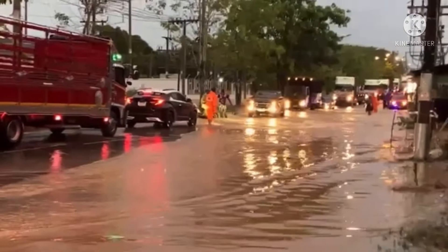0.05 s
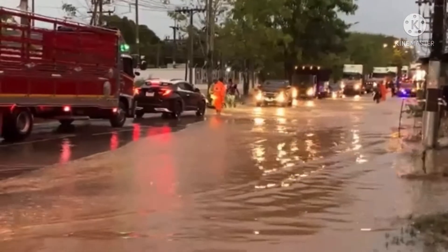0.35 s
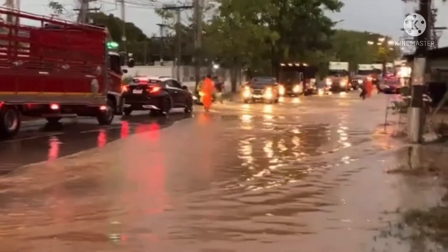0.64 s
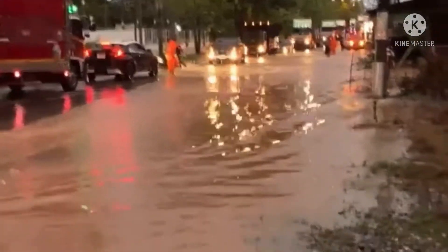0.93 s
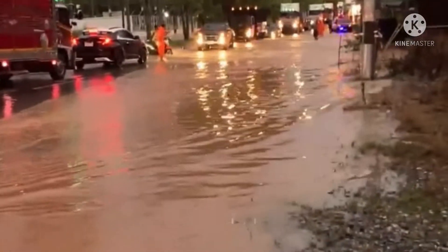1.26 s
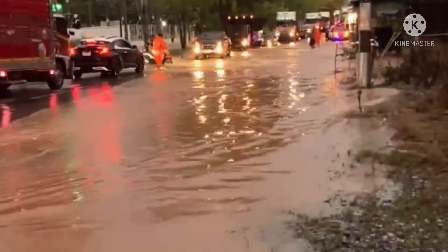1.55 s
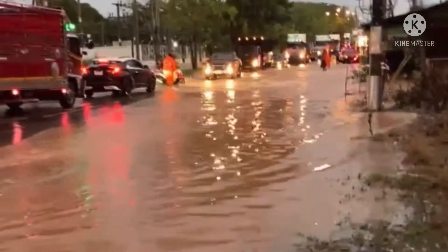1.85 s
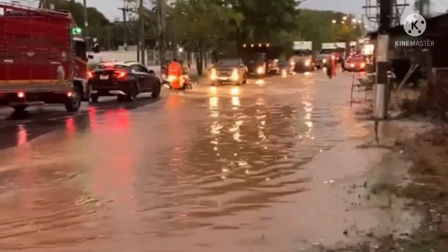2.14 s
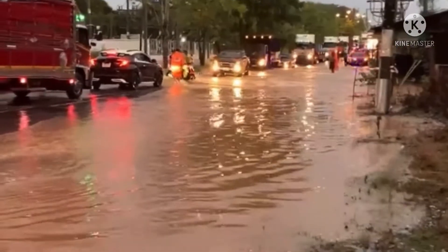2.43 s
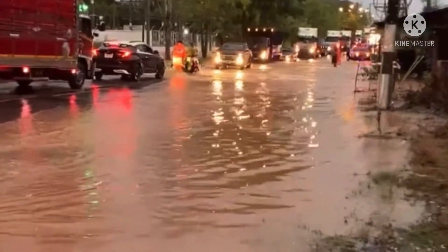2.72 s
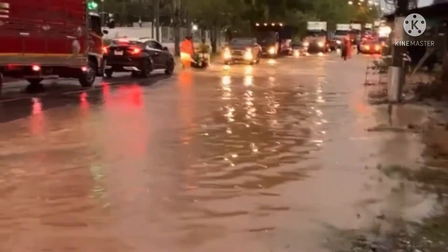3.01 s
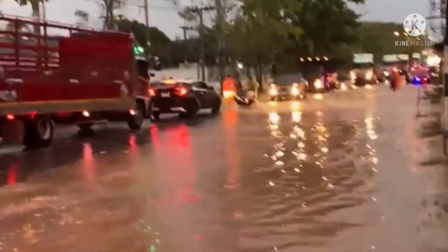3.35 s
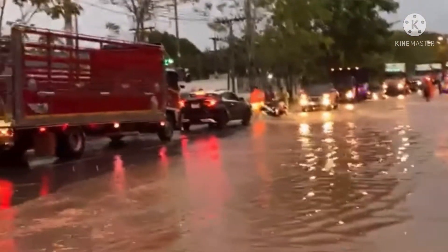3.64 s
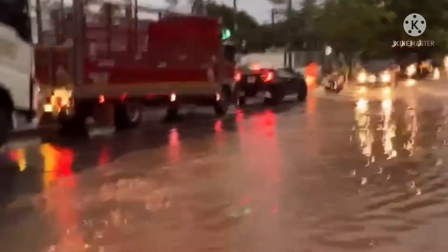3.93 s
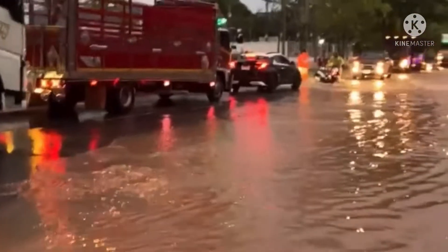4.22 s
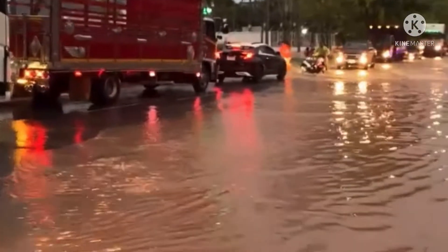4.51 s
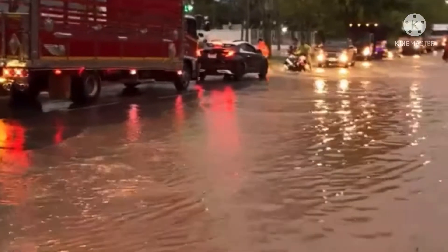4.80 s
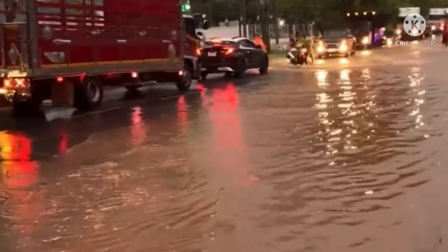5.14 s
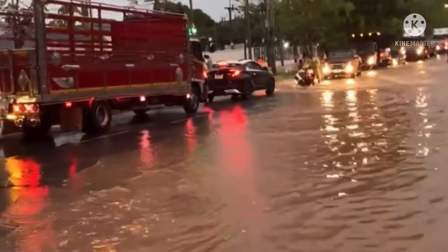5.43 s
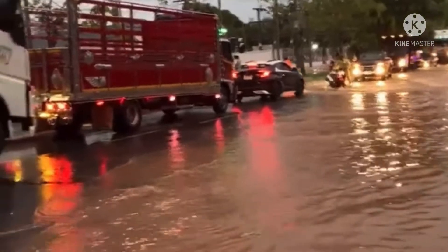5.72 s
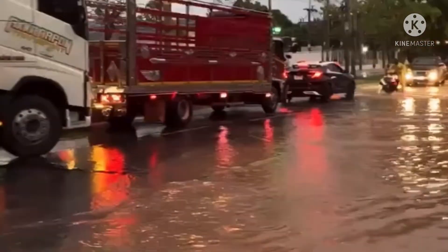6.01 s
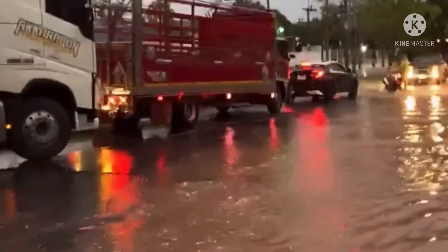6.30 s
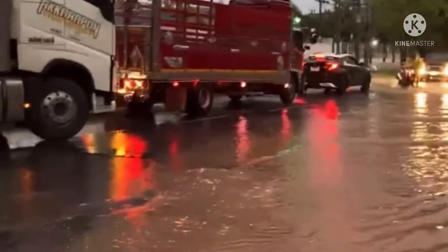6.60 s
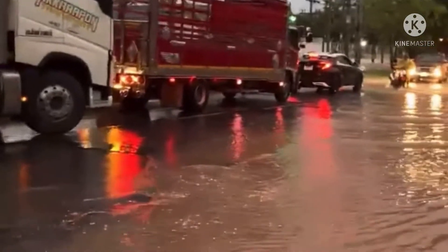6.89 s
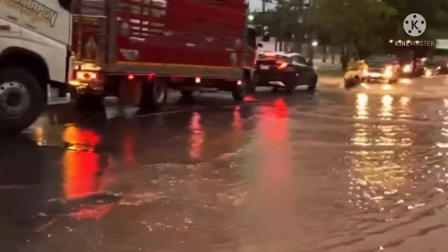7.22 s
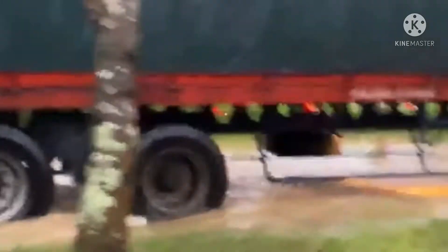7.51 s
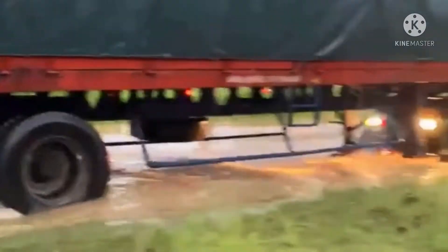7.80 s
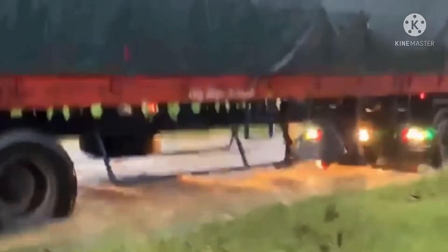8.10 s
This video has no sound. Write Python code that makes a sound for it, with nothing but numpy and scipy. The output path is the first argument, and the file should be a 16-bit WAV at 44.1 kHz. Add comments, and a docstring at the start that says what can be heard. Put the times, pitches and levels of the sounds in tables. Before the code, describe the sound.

Diesel trucks idle with a low throb while floodwater washes and gurgles around wading cars, then a heavy lorry growls through with spraying tyres.

```python
"""A flooded road: queued diesels idle while wading cars push bow waves that wash, fizz and gurgle.
Exhaust tones a few Hz apart beat into a throb; the engine blocks clatter at their own firing rates.
Drops tick nearby and air pockets plop. Near 7.2 s the queue fades out and a heavy lorry fades in,
pulling through the water with a growling exhaust and spraying tyres."""
import sys
import numpy as np
from scipy import signal
from scipy.fft import rfft, irfft, next_fast_len
from scipy.io import wavfile
from scipy.ndimage import uniform_filter1d, map_coordinates

SR = 44100
rng = np.random.default_rng(int(sys.argv[2]) if len(sys.argv) > 2 else 0)


def transcribe(u):
    """Save the signal u as a 16-bit wav file named by the first command-line argument.

    u: samples, shape (n,) or (channels, n), limited to [-1, 1]; the rate is SR.
    q: integer samples, one column per channel.
    """
    v = np.clip(np.atleast_2d(u).T, -1, 1)
    q = np.round(v * 32767).astype(np.int16)
    wavfile.write(sys.argv[1], SR, q)


N = 359415

# water noise spectra: f/Hz, relative density/dB
WASH_SPECTRUM = [(200, -19), (600, 2.5), (1500, 2.5), (2500, 1), (3150, 0.5), (3900, -1.9), (5000, -3),
                 (6200, -8), (7500, -19), (10000, -17), (15000, -38)]
CREST_SPECTRUM = [(1500, -20), (3300, 0), (5500, -2), (6500, -7), (9000, -24)]
GURGLE_SPECTRUM = [(1200, -30), (2000, -9), (2450, 1), (2900, -5), (3400, -11), (4400, -34)]
FIZZ_SPECTRUM = [(3000, -15), (6000, 5), (9500, 13), (10300, -3), (12800, 2), (13800, -9), (15500, -15)]
DROP_SPECTRUM = [(1000, -13), (4000, 2), (6000, 2), (8000, -1), (11000, -3.5), (13000, -2), (16000, -6)]
SPRAY_SPECTRUM = [(300, -10), (900, 6), (1400, 5.5), (1950, 0.5), (2500, 3), (3300, -0.5), (4000, -5.5),
                  (5200, -5.5), (7500, -10.5), (9500, -11), (10500, -14), (13000, -16), (15500, -20)]
# breaking wavelets: t/s, hiss swell/dB, gurgle swell/dB
WAVELETS = [(0.68, 3, 2), (0.94, 0.5, 5.5), (1.08, 0.5, 3), (2.66, 1.5, .8), (3.7, 0, 3), (3.98, .3, 4),
            (4.23, 1, 5.5), (4.45, 0, 4.5), (4.7, 1, 3), (5.19, 4.5, 1.5), (5.52, 1, 3.5), (5.75, .6, 3.5),
            (6.06, 1.5, 1.5), (6.88, .3, 4)]
# near drops: t/s, tick/dB, spatter/dB
DROPS = [(0.0953, -28, -38), (0.657, -38, -48), (1.0992, -39, -43), (2.6494, -43, -38),
         (2.9442, -36, -36.5), (2.955, -38, -44), (3.406, -38, -48), (3.5325, -42, -44),
         (3.9099, -31.5, -40), (4.4024, -37, -42)]
# air pockets: t/s, level/dB, f/Hz
PLOPS = [(0.32, -48, 3300), (0.33, -49, 4380), (0.55, -49, 3480), (0.58, -47, 4250), (0.82, -48, 3150),
         (0.9, -48, 2900), (0.93, -42, 2200), (1.78, -47, 2400), (2.89, -41, 1580), (4.22, -44, 2400),
         (4.28, -43, 1870), (4.45, -47, 2780), (4.62, -48, 2950), (4.685, -41, 1950), (5.17, -49, 3720),
         (5.42, -49, 3170), (5.52, -49, 3620), (5.8, -47, 3430), (5.99, -49, 3170), (7.44, -42, 3680),
         (7.445, -40, 3350), (7.53, -40, 2400), (7.595, -42, 3320), (7.76, -43, 3330), (7.78, -41, 2100),
         (7.91, -43, 3000)]

# engine noise spectra: f/Hz, relative density/dB
BOOM_SPECTRUM = [(20, -17), (37, 0), (48, -1), (58, 8), (64, 6.5), (75, 4), (120, -43)]
DRONE_SPECTRUM = [(45, -41), (70, -2.5), (100, 0), (125, -2.5), (150, -4.5), (240, -5.5), (330, -9),
                  (420, -17), (700, -19), (2000, -51.5)]
BLOCK_SPECTRUM = [(220, -23), (400, -2), (580, 0), (740, -4), (850, -0.5), (910, 2.5), (970, -1.5),
                  (1050, 0.5), (1160, -3.5), (1540, -3.5), (1900, -9.5), (2200, -12.5), (2450, -10),
                  (4000, -22.5)]  # blocks and tyres
GROWL_SPECTRUM = [(25, -11), (60, 2), (110, 2), (200, -5), (280, -3.5), (400, -1), (500, -3), (620, -7.5),
                  (720, -11), (1000, -15), (1600, -27), (3000, -49)]
# engine tones: multiple of firing rate, level/dB
TRUCK_TONES = [(2, -30), (3, -36.5), (4, -46.5), (22, -56.5)]
TRACTOR_TONES = [(1, -55), (4 / 3, -51), (2, -30), (7 / 3, -44.5), (3, -40), (4, -45.5), (26 / 3, -47.5),
                 (11, -45)]
CAB_TONES = [(22 / 3, -41)]  # tractor cab buzz
CAR_TONES = [(2, -42), (4, -35.5)]
LOPE_TONES = [(2 / 3, -40), (4 / 3, -37), (5 / 3, -34), (8 / 3, -38), (11 / 3, -36), (16 / 3, -38),
              (19 / 3, -36), (20 / 3, -40), (22 / 3, -39.5)]  # lorry's unequal cylinders
# firing rates: t/s, f/Hz
TRACTOR_FIRING_HZ = [(0, 30.24), (1, 30.12), (1.4, 30.01), (1.75, 29.99), (2.1, 29.89), (2.7, 29.9),
                     (3.1, 29.99), (3.5, 29.99), (3.9, 30.09), (4.35, 30.09), (4.8, 29.99)]  # idle hunts
LORRY_FIRING_HZ = [(7.3, 58.4), (7.62, 57.2), (7.72, 57.6), (7.82, 58.7), (8.15, 61.3)]
# queue envelopes: t/s, gain/dB
DRONE_DB = [(0, -29.6), (1.1, -30), (2.2, -29), (3.1, -28), (4.4, -28.6), (5.4, -29.4), (7, -29.4)]
CAR_DB = [(0, -3), (2.3, 2.5), (3.3, 0), (4.3, 4), (5.7, 1.5), (6.3, -7)]
TRACTOR_DB = [(.15, 3), (.6, -5), (1.1, 2), (1.55, 3.5), (1.85, -7), (2.08, 2), (2.3, -6), (2.62, -11),
              (2.8, 4.5), (3.2, -4), (3.5, 3), (3.9, -2), (4.4, -2.5), (4.8, 3.5), (5.15, 0), (5.6, 4),
              (6.05, -6), (6.55, 4), (6.85, 3.5), (7.1, -7)]
CAB_DB = [(0, -6), (3.3, -6), (4.3, 0), (5.4, -10), (6, 0), (7, 2.5)]  # grows as the microphone turns to it
# lorry envelopes: t/s, gain/dB
GROWL_DB = [(7.4, -26), (7.63, -23.5), (7.8, -27), (7.92, -26), (8.14, -24)]  # engine load
BARK_DB = [(7.4, -7.5), (7.77, -9), (7.85, -0.5), (8.1, 0.7)]  # exhaust opens up: 2nd harmonic
SPRAY_DB = [(7.5, -29.9), (7.8, -30.3), (8.15, -31)]  # wheels draw away
# lorry exhaust resonances: f/Hz, width/Hz, peak gain/dB
PIPE_MODES = [(57.5, 14, -16.4), (121.5, 13, -15.3), (177.5, 7, -23.2), (234.5, 22, -20.8)]
SILENCER_MODES = [(100, 17, -6), (210, 150, -9), (321, 14, -2), (384, 10, 3), (420, 8, 3.5)]

# scene fades: t/s, gain
QUEUE_FADE = [(7.17, 1), (7.231, .45), (7.233, .03), (7.255, 0)]
LORRY_FADE = [(7.303, 0), (7.33, .13), (7.39, .48), (7.44, 1)]
# left-right likeness: f/Hz, coherence
QUEUE_COHERENCE = [(150, 1), (300, 0.99), (450, 0.85), (750, 0.52), (1000, 0.76), (1900, 0.88),
                   (2800, 0.38), (4400, 0.45), (5300, 0.66), (6000, 0.55), (6800, 1), (8000, 1),
                   (8800, 0.45), (9900, 0.7), (12500, 0.55), (13800, 1)]
LORRY_COHERENCE = [(200, 1), (500, 0.96), (750, 0.7), (2000, 0.81), (4200, .4), (5200, .75), (6000, 0.69),
                   (6800, 1), (8000, 1), (8800, .45), (12500, 0.67), (13800, 0.87)]
# stereo balance: f/Hz, left minus right/dB
BALANCE_DB = [(300, 0), (500, 1), (700, 2.5), (1200, 3), (1900, -0.5), (2500, -.5), (5000, 0)]
# microphone ports: f/Hz, left phase lead/rad
PORT_LEAD_RAD = [(1900, 0), (2900, 1.55), (3250, 1.6), (3900, 0.65), (5400, 0.3), (6000, 1.3), (6500, 2.7),
                 (8100, 3.3), (9700, 6.3), (12300, 6.5), (13250, 9.2), (14700, 9.5), (15500, 11.5)]

TRUCK_HZ, CAR_HZ, PICKUP_HZ = 27.02, 25.08, 23.62  # idle firing rates
IN_STEP_S = 0.176  # idling engines fire together
TIME_S = np.arange(N) / SR


def amp(db):
    """dB to gain."""
    return 10 ** (np.asarray(db) / 20)


def unit(x):
    """Scale to rms 1."""
    return x / np.sqrt(np.mean(x ** 2) + 1e-20)


def along(points, hz):
    """Interpolate on a log frequency axis."""
    f, v = np.transpose(points)
    return np.interp(np.log(hz + 1), np.log(f + 1), v)


def curve(points):
    """Interpolate in time, per sample."""
    return np.interp(TIME_S, *np.transpose(points))


def wobble(rate_hz):
    """Smooth random curve, knots at rate_hz."""
    return map_coordinates(rng.standard_normal(int(N * rate_hz / SR) + 4), [TIME_S * rate_hz])


def filtered(x, response):
    """Apply a frequency response."""
    m = next_fast_len(N + SR // 2)
    return irfft(rfft(x, m) * response(np.fft.rfftfreq(m, 1 / SR)), m)[..., :N]


def coloured(pair, spectrum, coherence=QUEUE_COHERENCE):
    """Two unrelated signals to stereo of given spectrum and coherence, rms 1."""
    def response(hz):
        angle = np.arccos(np.clip(along(coherence, hz), -1, 1)) / 2
        return amp(along(spectrum, hz)) * [np.cos(angle), np.sin(angle)]
    mid, side = filtered(pair, response)
    return unit(np.array([mid + side, mid - side]))


def noise(patchy_db):
    """Two noises sharing random gain patches in time and frequency."""
    bins = signal.stft(rng.standard_normal((2, N)), nperseg=512)[2]
    patches = uniform_filter1d(rng.standard_normal(bins.shape[1:]), size=6, axis=0)
    patches = uniform_filter1d(patches, size=10, axis=1)
    return unit(signal.istft(bins * amp(patchy_db * unit(patches)), nperseg=512)[1][:, :N])


def bubbles(count, centre_hz, spread, cycles, size_db):
    """Small bubbles: panned damped sines of rising pitch; the higher, the weaker."""
    onset, pan = rng.random(count), rng.uniform(.2, .96, count)
    hz = np.clip(centre_hz * np.exp(spread * rng.standard_normal(count)), 300, 14000)[:, None]
    gain = amp(size_db * np.minimum(rng.exponential(size=count), 3))[:, None] / hz
    samples = np.arange(700)
    age = hz * samples / SR / cycles
    phase = 2 * np.pi * cycles * age * (1 + .03 * np.minimum(age, 2))
    ring = gain * np.exp(-3 * age) * np.sin(phase)
    at = ((onset * N).astype(int)[:, None] + samples).ravel()
    return unit(np.array([np.bincount(at, (ring * g[:, None]).ravel(), N)[:N] for g in (pan, 1 - pan)]))


def wavelets(rise_s=.055, fall_s=.12):
    """Breaking wavelets briefly lift hiss and gurgle; both in dB."""
    swell_db = np.zeros((2, N))
    for start_s, hiss_db, gurgle_db in WAVELETS:
        t = TIME_S - start_s
        shape = np.exp(-(np.minimum(t, 0) / rise_s) ** 2 - np.maximum(t, 0) / fall_s)
        swell_db += np.outer([hiss_db, gurgle_db], shape)
    return swell_db


def floodwater(wash_settle_s=1.26, fizz_settle_s=1.7):
    """Bow waves wash, gurgle and fizz; the water starts churned up and settles."""
    hiss_db, gurgle_db = wavelets()
    wash_db = -41 + 3.9 * np.exp(-TIME_S / wash_settle_s)
    fizz_db = -63.5 + 8.4 * np.exp(-TIME_S / fizz_settle_s) + hiss_db
    surge_db = .35 * wobble(12)
    wash = amp(wash_db + surge_db) * coloured(noise(patchy_db=1.7), WASH_SPECTRUM)
    crest_gain = amp(-47) * np.sqrt(np.maximum(amp(hiss_db) ** 2 - 1, 0))
    crests = crest_gain * coloured(noise(patchy_db=2.5), CREST_SPECTRUM)
    gurgle = amp(gurgle_db - 51.3) * coloured(noise(patchy_db=3.5), GURGLE_SPECTRUM)
    froth = amp(gurgle_db - 49.7) * bubbles(2200, centre_hz=2750, spread=.3, cycles=48, size_db=5.5)
    fizz = amp(fizz_db + surge_db + 2.2) * coloured(noise(patchy_db=2.5), FIZZ_SPECTRUM)
    prickle = amp(fizz_db - 13) * bubbles(900, centre_hz=10500, spread=.14, cycles=8, size_db=4)
    return wash + crests + gurgle + froth + fizz + prickle


def drops(tick_s=.0007, spatter_s=.006):
    """Each drop ticks on impact, then spatters for a few ms."""
    t, out = TIME_S[:SR // 10], np.zeros((2, N))
    hiss = coloured(noise(patchy_db=1), DROP_SPECTRUM)
    tick = t / tick_s * np.exp(1 - t / tick_s)
    spatter = (1 - np.exp(-t / tick_s)) * np.exp(-(t / spatter_s) ** 2)
    for start_s, tick_db, spatter_db in DROPS:
        span = slice(round(start_s * SR), round(start_s * SR) + len(t))
        out[:, span] += np.hypot(amp(tick_db) * tick, amp(spatter_db) * spatter) * hiss[:, span]
    return out


def plops(rise_s=.008, fall_s=.035, width_hz=150, climb_per_s=.8):
    """Air pockets split into like-sized bubbles that ring together and climb in pitch."""
    t, out = TIME_S[:SR // 6], np.zeros((2, N))
    cluster = unit(filtered(rng.standard_normal((3, N)), lambda hz: np.exp(-(hz / width_hz) ** 2)))
    shape = (1 - np.exp(-t / rise_s)) * np.exp(-(t / fall_s) ** 2)
    for start_s, db, hz in PLOPS:
        span = slice(round(start_s * SR), round(start_s * SR) + len(t))
        phase = 2 * np.pi * hz * t * (1 + climb_per_s * (t - fall_s) / 2)
        ring = cluster[2, span] * np.sin(phase) + cluster[:2, span] * np.cos(phase)
        out[:, span] += amp(db) * shape * ring
    return out


def tones(firings, table, waver_db, drift_cycles, aligned=False):
    """Engine tones locked to the running firing count; aligned ones start in phase with it."""
    out = np.zeros(N)
    for multiple, db in table:
        cycles = multiple * firings + (0 if aligned else rng.random()) + drift_cycles * wobble(2.99)
        out += amp(db + waver_db * wobble(3.01)) * np.sqrt(2) * np.sin(2 * np.pi * cycles)
    return out


def knocks(firings, decay_firings, scatter_db, repeat_share, cylinders=4):
    """Unequal cylinders fire noise bursts; a share repeats every engine cycle."""
    index = firings.astype(int)
    strength = rng.standard_normal(cylinders)[index % cylinders] + rng.standard_normal(1024)[index]
    burst = amp(scatter_db * strength) * np.exp(-(firings % 1) / decay_firings)
    period = int(N * cylinders / (firings[-1] - firings[0]))
    repeating = rng.standard_normal((2, period))[:, (firings * period / cylinders).astype(int) % period]
    carrier = np.sqrt(repeat_share) * repeating + np.sqrt(1 - repeat_share) * noise(patchy_db=2)
    return unit(uniform_filter1d(burst, size=90)) * carrier


def clatter(truck, pickup, dull_hz=5000):
    """Two diesels knock at each firing amid traffic noise, dulled by distance."""
    near = amp(-4) * knocks(truck, decay_firings=.49, scatter_db=1, repeat_share=.38)
    near += amp(-6.5) * knocks(pickup, decay_firings=.45, scatter_db=.5, repeat_share=.44)
    traffic = noise(patchy_db=2.4)
    dulled = filtered(near + traffic, lambda hz: 1 / (1 + (hz / dull_hz) ** 4))
    return amp(-32 + .22 * wobble(6)) * coloured(dulled, BLOCK_SPECTRUM)


def idling_queue(turn_db_per_s=.1723):
    """Truck and tractor exhausts beat into a throb over hum, boom, drone and clatter."""
    t, start = TIME_S - IN_STEP_S, 8 + rng.random()
    truck, car, pickup = [hz * t + start + .008 * wobble(1.5) for hz in (TRUCK_HZ, CAR_HZ, PICKUP_HZ)]
    tractor = np.cumsum(curve(TRACTOR_FIRING_HZ)) / SR
    tractor += start - tractor[round(IN_STEP_S * SR)]
    truck_exhaust = tones(truck, TRUCK_TONES, waver_db=.9, drift_cycles=.02, aligned=True)
    tractor_exhaust = tones(tractor, TRACTOR_TONES, waver_db=.8, drift_cycles=.025, aligned=True)
    throb = truck_exhaust + amp(curve(TRACTOR_DB)) * tractor_exhaust
    hum = amp(curve(CAR_DB)) * tones(car, CAR_TONES, waver_db=1.5, drift_cycles=.045, aligned=True)
    buzz = amp(curve(CAB_DB)) * tones(tractor, CAB_TONES, waver_db=1, drift_cycles=.038)
    boom = amp(-37 + 2 * wobble(7)) * coloured(noise(patchy_db=.5), BOOM_SPECTRUM)
    drone = amp(curve(DRONE_DB) + .6 * wobble(6)) * coloured(noise(patchy_db=1), DRONE_SPECTRUM)
    facing = amp(turn_db_per_s * t)  # microphone turns towards the trucks
    return throb + hum + buzz + boom + facing * (drone + clatter(truck, pickup))


def tyre_spray():
    """The lorry's tyres throw hissing spray and churn up bubbles."""
    spray = amp(curve(SPRAY_DB)) * coloured(noise(patchy_db=1.1), SPRAY_SPECTRUM, LORRY_COHERENCE)
    return spray + amp(-40.5) * bubbles(3000, centre_hz=2820, spread=.4, cycles=20, size_db=3.5)


def exhaust_pipe(firings, firing_hz):
    """Four harmonics swell as the revs carry each through a pipe resonance."""
    first, second, third, fourth = [
        tones(firings, [(k, db)], waver_db=.76, drift_cycles=.0074)
        / np.hypot(1, 2 * (k * firing_hz - hz) / width_hz)
        for k, (hz, width_hz, db) in enumerate(PIPE_MODES, 1)]
    return first + amp(curve(BARK_DB)) * second + third + fourth


def silencer_kicks(firings, kick_at_s=7.767, scatter_db=1.3, muffle_hz=480):
    """Every third firing is harder and rings the silencer's fixed resonances."""
    group = np.floor((firings - firings[round(kick_at_s * SR)]) / 3)
    at = np.flatnonzero(np.diff(group))
    pulses = np.zeros(N)
    pulses[at] = -amp(scatter_db * rng.standard_normal(256)[:len(at)])
    ring = filtered(pulses, lambda f: sum(amp(db) * 1j * f * width / (hz * hz - f * f + 1j * f * width)
                                          for hz, width, db in SILENCER_MODES))
    return unit(filtered(ring, lambda hz: 1 / (1 + (hz / muffle_hz) ** 8)))


def lorry():
    """Six-cylinder diesel under load: exhaust, lope, pulsed growl and tyre spray."""
    firing_hz = curve(LORRY_FIRING_HZ)
    firings = np.cumsum(firing_hz) / SR + .0045 * wobble(45)  # timing jitter
    exhaust = exhaust_pipe(firings, firing_hz)
    lope = tones(firings, LOPE_TONES, waver_db=2, drift_cycles=.025)
    bursts = knocks(firings, decay_firings=.7, scatter_db=.8, repeat_share=.4, cylinders=6)
    growl = coloured(bursts, GROWL_SPECTRUM, LORRY_COHERENCE) + amp(-2) * silencer_kicks(firings)
    return exhaust + lope + amp(curve(GROWL_DB)) * growl + tyre_spray()


def scene():
    """Queue fades out, lorry fades in; plops run through both."""
    queue = idling_queue() + floodwater() + drops()
    mix = curve(QUEUE_FADE) * queue + curve(LORRY_FADE) * lorry() + plops()
    return filtered(mix, lambda hz: amp(np.outer([.5, -.5], along(BALANCE_DB, hz))))


def record(dry, top_hz=15780):
    """A phone's two ports hear the treble out of phase; band-limited."""
    ports = filtered(dry, lambda hz: np.exp(1j * np.outer([.5, -.5], along(PORT_LEAD_RAD, hz))))
    return filtered(ports, lambda hz: hz < top_hz)


dry = scene()
out = record(dry)
transcribe(out)
```